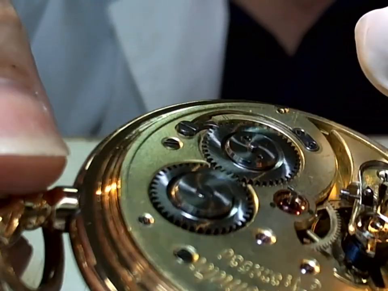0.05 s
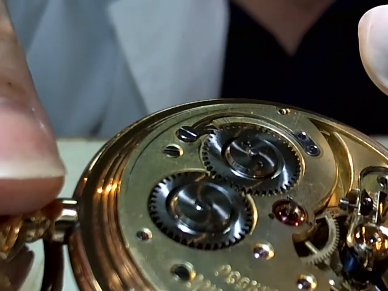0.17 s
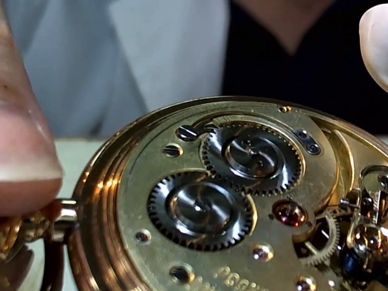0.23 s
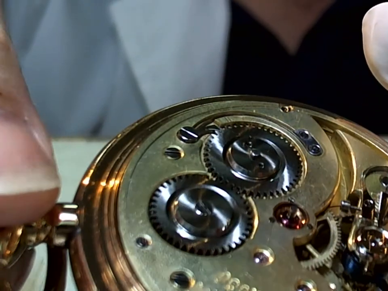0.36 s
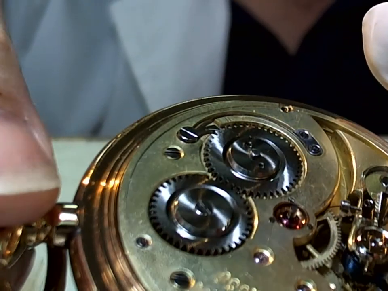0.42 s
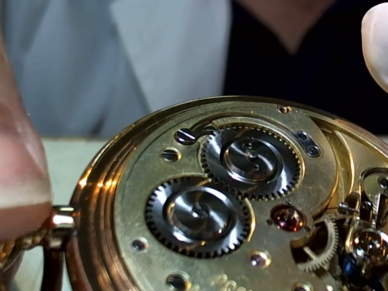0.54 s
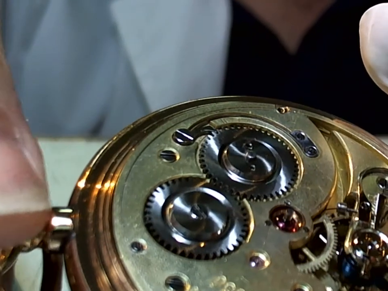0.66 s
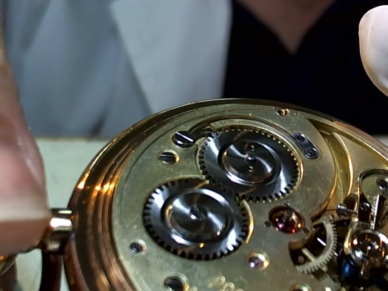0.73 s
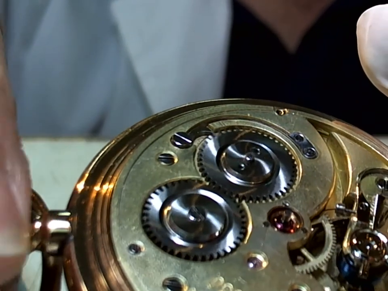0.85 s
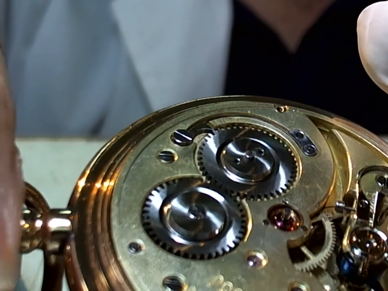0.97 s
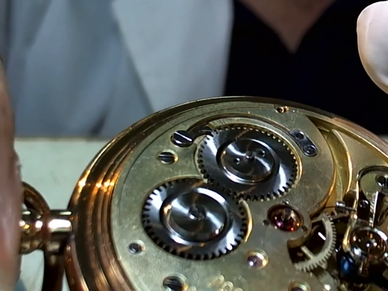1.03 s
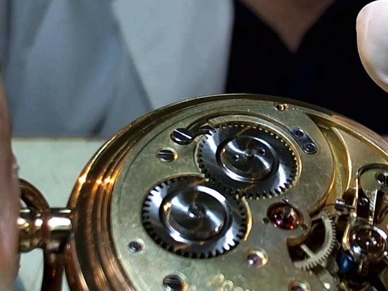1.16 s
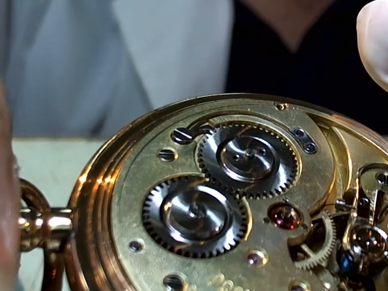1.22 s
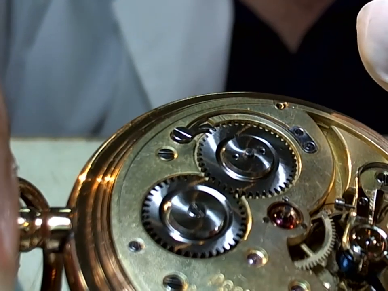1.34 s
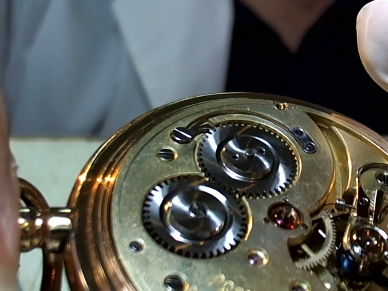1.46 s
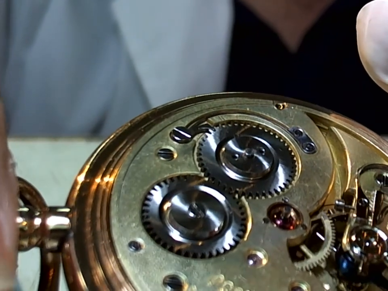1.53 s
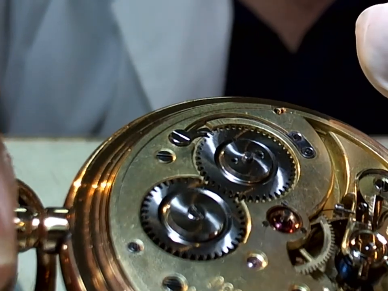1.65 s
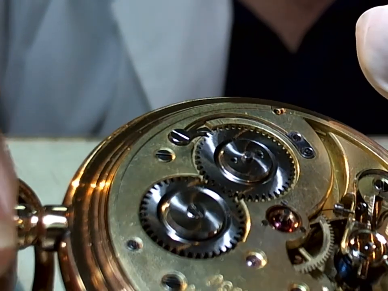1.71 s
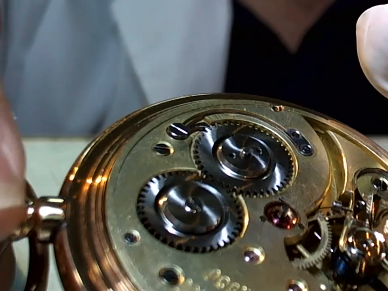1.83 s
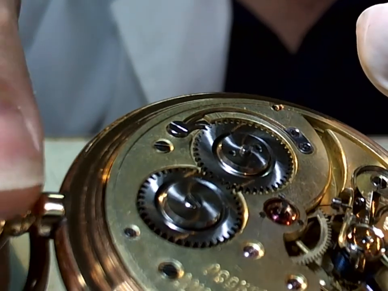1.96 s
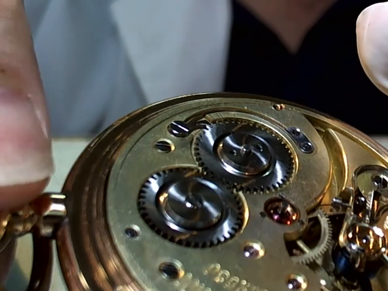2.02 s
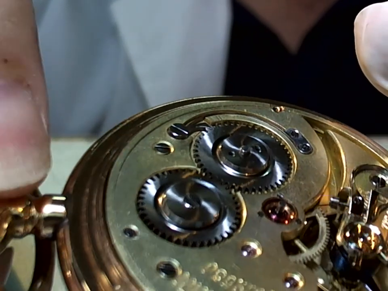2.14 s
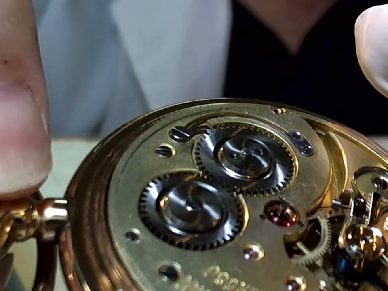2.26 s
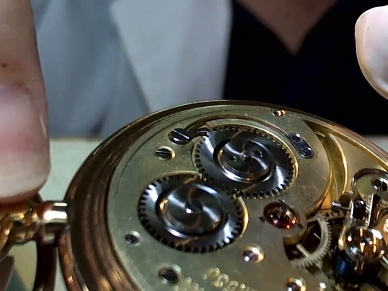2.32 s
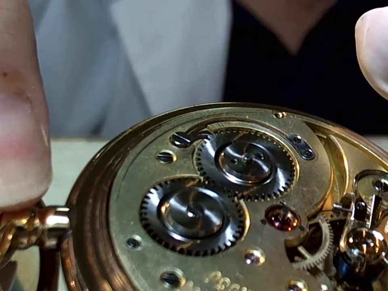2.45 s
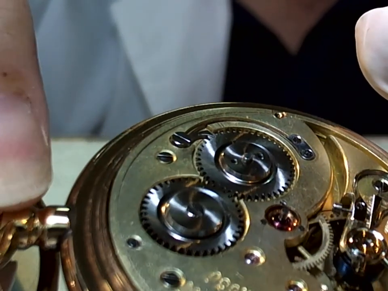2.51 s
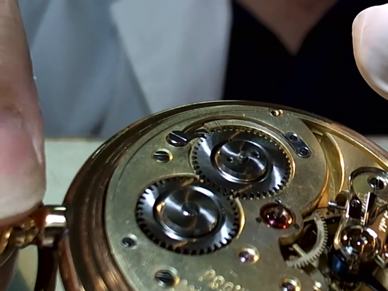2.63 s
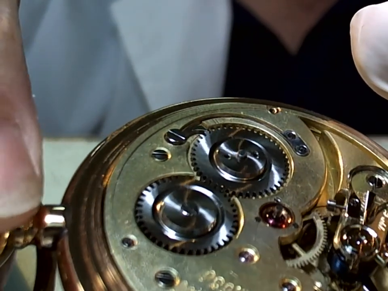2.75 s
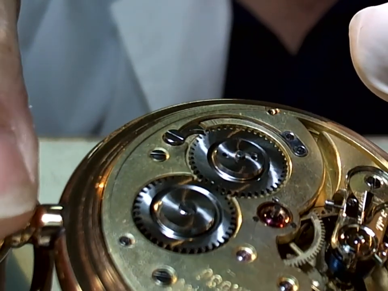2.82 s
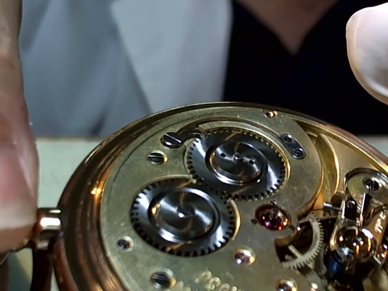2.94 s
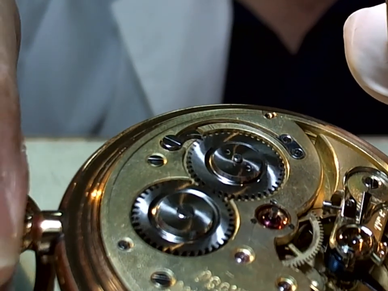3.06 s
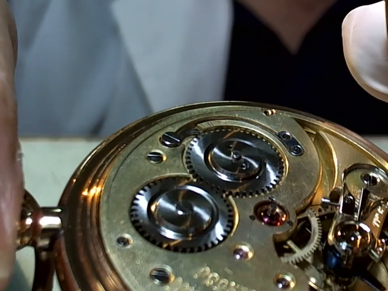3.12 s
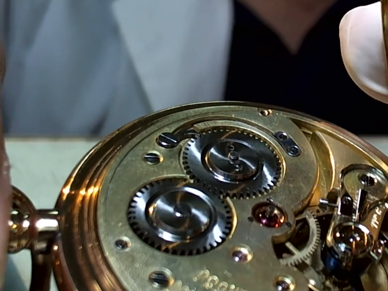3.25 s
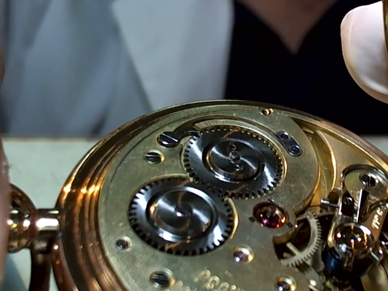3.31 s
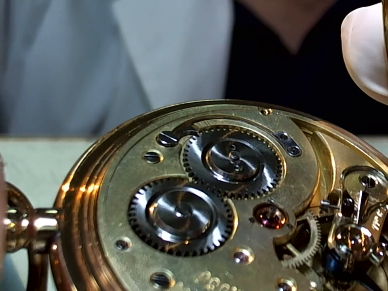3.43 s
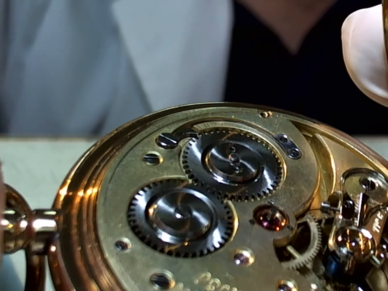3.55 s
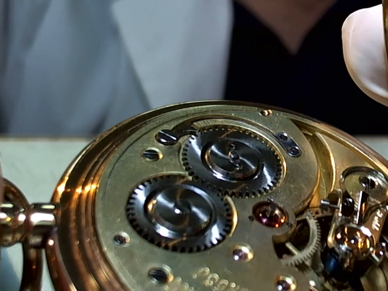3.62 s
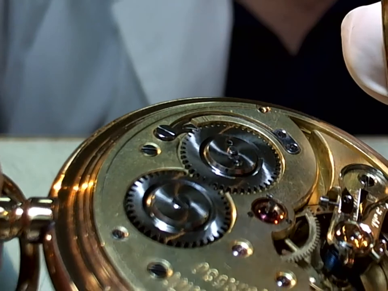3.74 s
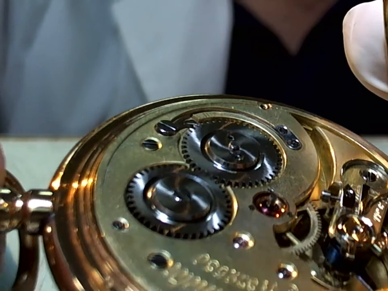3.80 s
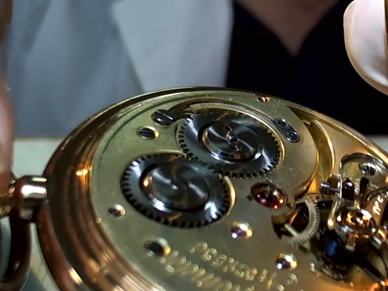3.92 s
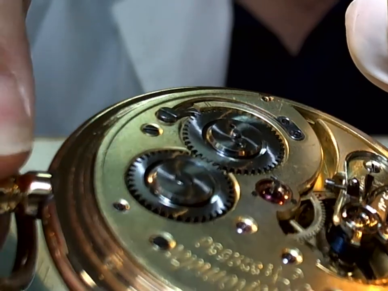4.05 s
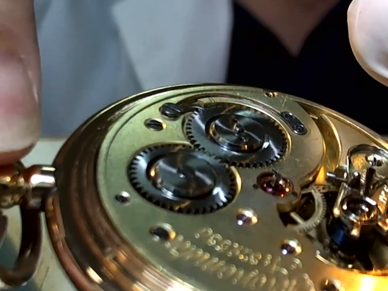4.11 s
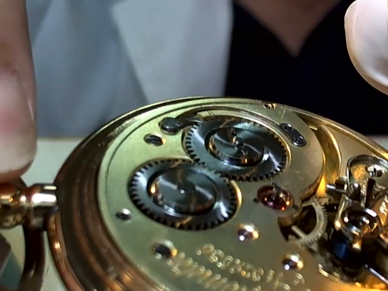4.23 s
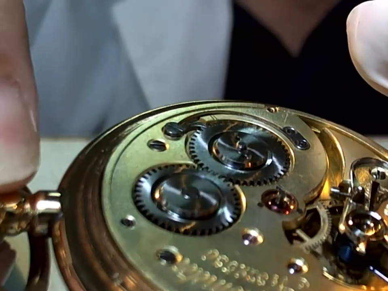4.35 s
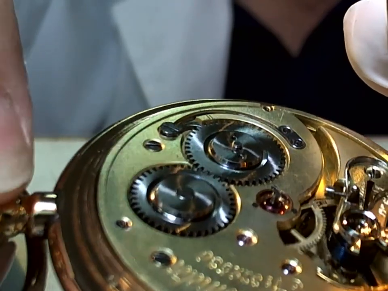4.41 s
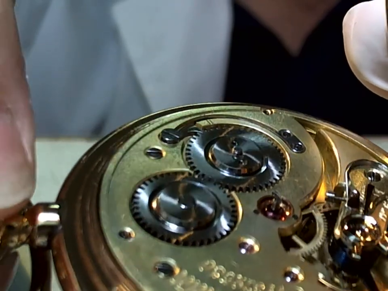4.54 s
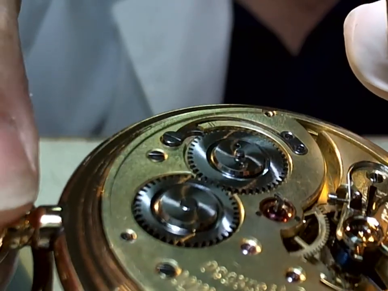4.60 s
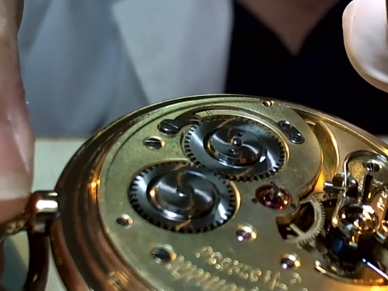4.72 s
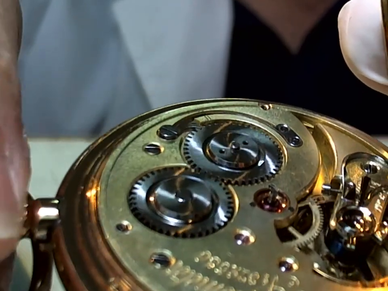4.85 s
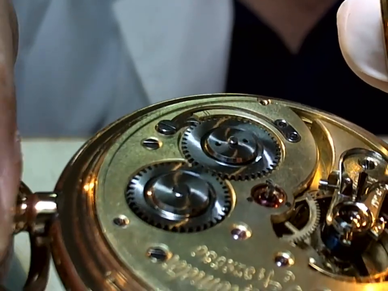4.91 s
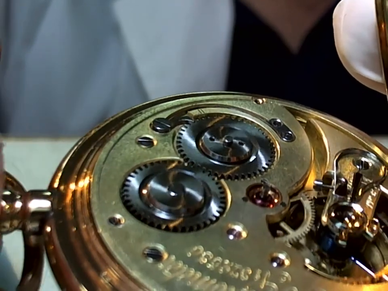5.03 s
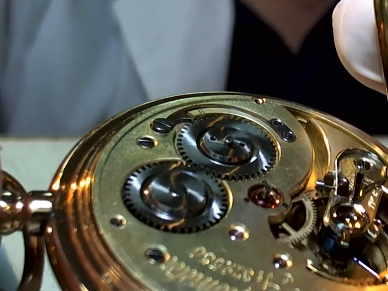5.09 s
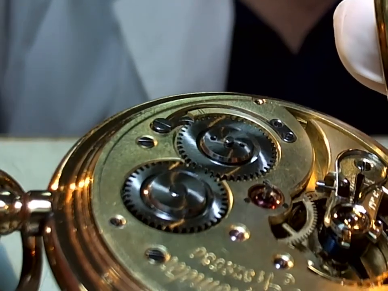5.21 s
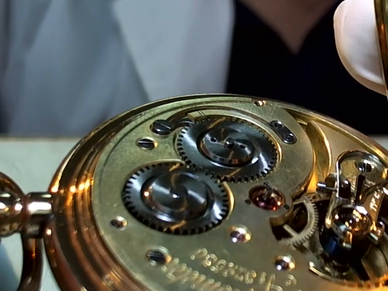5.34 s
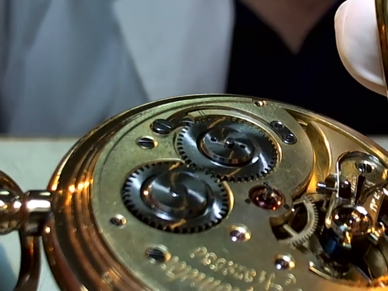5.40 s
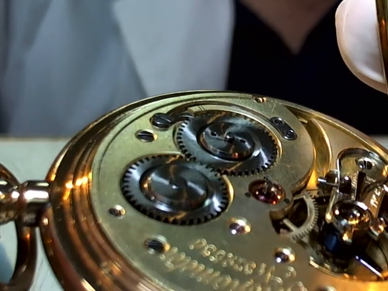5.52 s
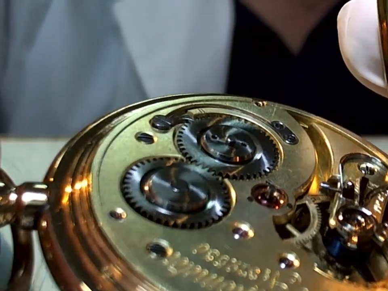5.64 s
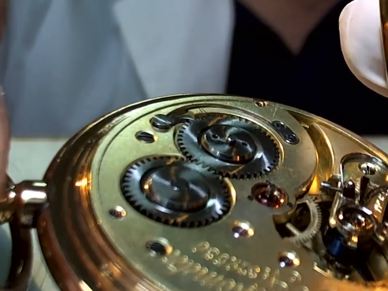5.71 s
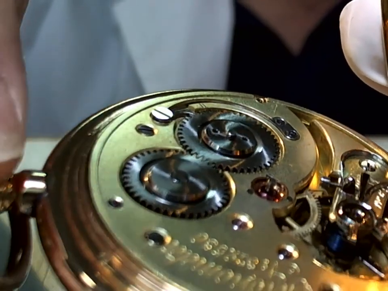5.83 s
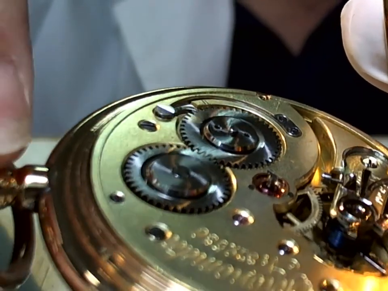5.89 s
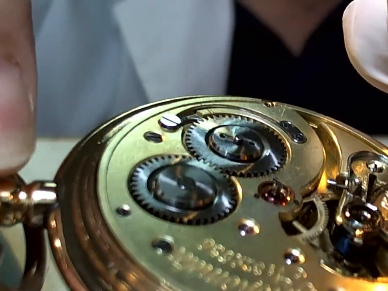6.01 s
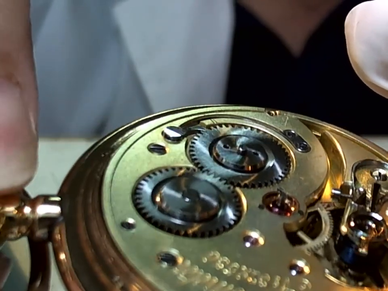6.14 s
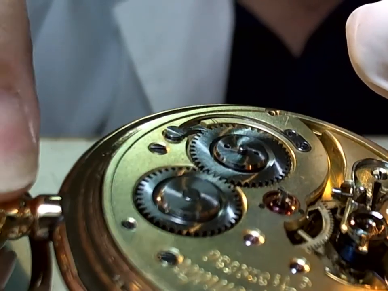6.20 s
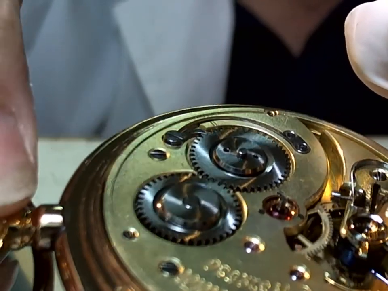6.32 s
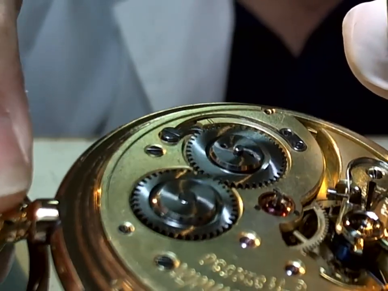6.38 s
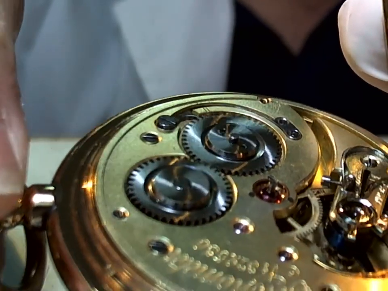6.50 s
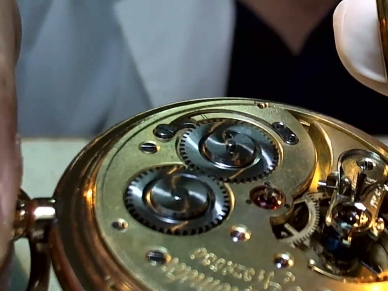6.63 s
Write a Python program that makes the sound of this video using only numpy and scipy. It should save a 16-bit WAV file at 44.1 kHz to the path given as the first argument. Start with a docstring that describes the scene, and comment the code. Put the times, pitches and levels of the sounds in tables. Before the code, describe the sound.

A small quiet room with low hum and soft air. A wooden-cased clock ticks about every 0.55 seconds behind, and a fainter, softer tsk comes once a second. Close up, fingers bump a pocket watch with muffled low thuds. From 0.6 to 1.2 seconds the crown turns back with about ten light, thin clicks. From 1.85 to 2.2 a louder forward run of crisp steel ratchet snaps follows, with a sharp extra slip at 2.1. Lighter backward clicking returns from 2.8 to 3.3, then a fast forward burst at 3.9 to 4.15. Faint, fuzzy squeaks slip in between 3.6 and 4.9. Another soft backward run spans 4.6 to 5.2, bright forward snaps run from 5.7 to 6.05, and a last light run starts at 6.4. Clicks ring briefly in metal; tiny scratchy contacts fall between.

```python
"""A pocket watch with its back open is wound close to the microphone, in a small quiet room.
From the start a low hum and soft air lie behind, a clock ticks further off, and a fainter one steps once a second.
Low thuds and short contact noises fall throughout; first the crown turns back, and clutch teeth slip, light and thin.
Three forward turns then alternate with three more turns back; each forward turn snaps the click over the ratchet.
Snaps are filtered impulses with noise that excite decaying modes; faint gliding squeaks join in the second half."""
import sys
import numpy as np
from scipy import signal
from scipy.fft import rfft, irfft
from scipy.io import wavfile
from scipy.ndimage import uniform_filter1d

SR = 44100
rng = np.random.default_rng(int(sys.argv[2]) if len(sys.argv) > 2 else 0)


def materialize(psi):
    """Save the field psi as 16-bit PCM at rate SR to the path in sys.argv[1].

    A 1-D psi becomes a single channel; in a 2-D psi each row is a channel.
    """
    bounded = np.clip(np.atleast_2d(psi).T, -1, 1)
    quanta = np.round(bounded * 32767).astype(np.int16)
    wavfile.write(sys.argv[1], SR, quanta)


N = 293706  # samples


def amp(db):
    """Gain as the antilogarithm of a level in decibels."""
    return 10 ** (np.asarray(db) / 20)


def unit(x):
    """Normalization by signal power, to an rms of one."""
    return x / np.sqrt(np.mean(x ** 2) + 1e-20)


def read(points, hz):
    """Linear interpolation of a spectrum along a log-frequency axis."""
    f, value = np.transpose(points)
    return np.interp(np.log(hz + 1), np.log(f), value)


def hill(hz, centre_hz, octaves):
    """Gaussian weighting on the octave scale."""
    distance = np.log2((hz + 1) / centre_hz) / octaves
    return np.exp(-.5 * distance ** 2)


def add(mix, s, sound):
    """Superposition: adds a sound to the mix at time s, clipped to its ends."""
    at = round(s * SR)
    sound = sound[..., max(-at, 0):]
    part = mix[..., max(at, 0):][..., :sound.shape[-1]]
    part += sound[..., :part.shape[-1]]


def seconds(size):
    """Time axis by uniform sampling."""
    return np.arange(size) / SR


def band_noise(centre_hz, octaves, size):
    """White noise shaped by a Gaussian band in the spectrum, at an rms of one."""
    spectrum = rfft(rng.standard_normal(size))
    band = hill(np.fft.rfftfreq(size, 1 / SR), centre_hz, octaves)
    return unit(irfft(spectrum * band, size))


def causal(db):
    """Minimum-phase response: the Hilbert transform of log gain gives a sharp front, then the ring."""
    log_gain = np.log(amp(np.concatenate([db, db[-2:0:-1]])))
    return np.exp(np.conj(signal.hilbert(log_gain)))[:len(db)]


def background(side_db=-9, air_db=-58.5, waver=0.31, low_cut_hz=50):
    """Diffuse air noise, wider in the bass than in the treble, under hum sines of wavering phase."""
    # spectrum of the air: (frequency [Hz], relative level per Hz [dB])
    air_spectrum = [(15, -48.5), (25, -22), (70, -38.5), (117, 3), (394, -6), (463, -11), (516, -9.5),
                    (775, -13), (1190, -13.5), (1520, -19.5), (2610, -20.5), (3820, -30), (5570, -28),
                    (12500, -43), (16000, -64.5)]
    # hum lines: (frequency [Hz], rms level before the left-right balance [dB])
    hum_lines = [(60, -77.5), (119.6, -69.5), (240, -70), (409, -70.5), (521, -69.5)]
    hz, t = np.fft.rfftfreq(N, 1 / SR), seconds(N)
    shape = amp(read(air_spectrum, hz)) * hz ** 4 / (hz ** 4 + low_cut_hz ** 4)
    width = amp(read([(700, 10), (1500, -30.5)], hz))
    spectra = rfft(rng.standard_normal((2, N)))
    mid, side = irfft(spectra * np.array([shape, shape * width]), N)
    air = amp(air_db) * (unit(mid) + amp(side_db) * np.outer([1, -1], unit(side)))
    knots = np.linspace(0, t[-1], num=60)
    hum = np.zeros(N)
    for f, db in hum_lines:
        drift = waver * np.interp(t, knots, rng.standard_normal(len(knots)))  # radians
        hum += amp(db) * np.sqrt(2) * np.sin(2 * np.pi * f * t + drift)
    return (air + hum) * amp([[-.9], [.9]])  # slightly stronger on the right


def room(x, tail_db=-14, spread=0.21, count=3):
    """Reverberant decay as convolution with fading noise; three noise tails crossfade in turn."""
    # colour of the tail: (frequency [Hz], relative gain [dB])
    tail_colour = [(300, -1), (1500, 4.5), (2500, 1.5), (5500, 1), (7400, 2), (8200, -9.5), (9000, 2.5),
                   (9900, -4), (13000, -5)]
    # reverberation time: (frequency [Hz], t60 [s])
    tail_t60 = [(500, 0.28), (2500, 0.072), (6000, 0.11), (13000, 0.12)]
    out, t = np.zeros((2, N)), seconds(N)
    for k in range(count):
        noise = rng.standard_normal((3, SR // 3))
        hz, age, z = signal.stft(noise[0] + spread * noise[1:], SR, nperseg=256)
        fall_db = 60 * age / read(tail_t60, hz)[:, None]
        z *= amp(read(tail_colour, hz)[:, None] - fall_db)
        tail = signal.istft(z, SR, nperseg=256)[1]
        tail *= seconds(tail.shape[1]) > .005  # silent for the first 5 ms
        tail /= np.linalg.norm(tail[0])
        # the squared shares of the tails keep a constant sum
        share = np.sqrt(2 / count) * np.cos(np.pi * (7 * t + k / count))
        out += signal.oaconvolve((share * x.mean(0))[None], tail, axes=1)[:, :N]
    return amp(tail_db) * out


def far_clock(level_db=-60, hz=5300, rise_s=0.015):
    """A distant clock as a periodic source: each one-second step is a soft tsk of narrow noise."""
    out, t = np.zeros(N), seconds(size=4096)
    swell = (t / rise_s) ** 2 * np.exp(2 - 2 * t / rise_s)
    for s in np.arange(.329, N / SR, 1):
        add(out, s, amp(level_db) * band_noise(hz, 0.19, len(t)) * swell)
    return out


def clock(case_rise_s=0.012, case_delay_s=0.0091, run_s=0.075, rest=0.096, side=0.44, alike=0.54):
    """Modal resonance: the escapement strikes, the works rattle and the wooden case swells up behind."""
    # modes of the wooden case: (frequency [Hz], gain before the onset [dB], t60 [s])
    wood_modes = [(415.5, -30, 0.068), (527.6, -37.5, 0.064), (620, -67, 0.25), (722, -37.5, .06),
                  (845, -32.5, 0.1), (968, -55.5, 0.096), (1075, -41.5, .11), (1170, -37, 0.06),
                  (2520, -33.5, 0.04)]
    # rattle of the works: (centre [Hz], width [octaves], gain before the envelope [dB],
    #                       delay [s], rise [s], decay [s])
    works_bands = [(4670, 0.2, -32.5, 0, 0.00059, 0.0048), (5190, 0.16, -40, 0.004, 0.00352, 0.019),
                   (2410, 0.28, -47.5, .003, 0.0014, 0.023), (558, 0.82, -39.5, 0.00031, 0.01, 0.029),
                   (1900, 0.73, -49, 0.013, 0.0016, 0.0067), (9310, 0.16, -64.5, 0.0032, 0.001, 0.048)]
    out, t = np.zeros((2, N)), seconds(size=8192)
    late = np.maximum(t - case_delay_s, 0)
    ears = side * np.array([[1], [-1]])  # the case reaches the two sides a little out of step
    body = np.zeros((2, len(t)))
    for hz, db, t60 in wood_modes:
        phase = 2 * np.pi * (hz * t + rng.random()) + ears * 400 / hz
        body += amp(db - 60 * late / t60) * np.sin(phase)
    body *= 1 - np.exp(-(late / case_rise_s) ** 2)
    settle = rest + (1 - rest) / (1 + np.exp((t - run_s) / .004))  # the wheels come to a stop
    beats = np.arange(-.0112, N / SR, .5497)  # seconds
    for s in beats:
        add(out, s, body)
    for hz, octaves, db, delay, rise, decay in works_bands:
        age = np.maximum(t - delay, 0)
        envelope = amp(db) * settle * (1 - np.exp(-age / rise)) * np.exp(-age / decay)
        usual = band_noise(hz, octaves, len(t))  # the same parts meet in much the same way on every beat
        for s in beats:
            rattle = envelope * (alike * usual + (1 - alike) * band_noise(hz, octaves, len(t)))
            add(out, s, rattle * np.linalg.norm(envelope) / np.linalg.norm(rattle))
    return out


def squeaks(width_hz=330):
    """Quadrature modulation: low-passed noise carried up to a gliding frequency as a fuzzy squeak."""
    # faint squeaks: (time [s], length [s], rms level before the fades [dB], start [Hz], end [Hz])
    squeak_list = [(3.616, .13, -53.5, 2330, 2430), (3.977, 0.1, -47.5, 2100, 2130),
                   (4.156, .12, -56, 2930, 2520), (4.584, 0.11, -56.5, 2070, 2000),
                   (4.709, .02, -42, 2050, 1900), (4.8, .1, -46, 2185, 2296)]
    out = np.zeros(N)
    low_pass = signal.butter(2, width_hz / 2, fs=SR, output="sos")
    for s, length, db, start_hz, end_hz in squeak_list:
        size = int(length * SR)
        fuzz = signal.sosfilt(low_pass, rng.standard_normal((2, N)))[:, -size:]
        turn = 2 * np.pi * np.cumsum(np.linspace(start_hz, end_hz, size)) / SR
        squeak = unit(fuzz[0] * np.cos(turn) + fuzz[1] * np.sin(turn))
        add(out, s, amp(db) * squeak * signal.windows.tukey(size, .5))
    return out


def fidgets(count, level_db, centre_hz, octaves, uneven_db=2):
    """Jittered point process: light shifts of the grip over the whole time, as (time [s], level [dB], Hz)."""
    when, strength, pitch = rng.uniform(-1, 1, (count, 3)).T
    s = (np.arange(count) + .5 + .5 * when) * N / SR / count
    return list(zip(s, level_db + uneven_db * strength, centre_hz * 2 ** (octaves * pitch)))


def low_thuds(rise_s=.012):
    """Heavily damped oscillation: bumps of the hands and two low clock knocks give a few cycles each."""
    # low thuds: bumps of the hands, and the extra low knock of two stronger clock beats (391 Hz):
    # (time [s], peak level of the sine part [dB], frequency [Hz])
    thud_list = [(.001, -39.5, 391), (0.049, -45.5, 232), (0.597, -45, 200), (.858, -46, 270),
                 (1.046, -48, 161), (1.229, -49.5, 190), (1.443, -52, 170), (1.549, -47, 191),
                 (2.236, -44.5, 223.5), (2.374, -46.5, 194), (3.84, -38.5, 391), (3.931, -47, 250.4),
                 (4.948, -44, 282), (5.237, -47, 244)]
    out, t = np.zeros(N), seconds(size=6000)
    swell = (t / rise_s) ** 2 * np.exp(2 - 2 * t / rise_s)
    for s, db, hz in thud_list + fidgets(count=8, level_db=-52.5, centre_hz=209, octaves=0.38):
        thud = np.sin(2 * np.pi * hz * t) + .5 * band_noise(hz, 0.76, len(t))
        add(out, s, amp(db) * swell * thud)
    return out


def contacts(linger=0.14, linger_s=0.0066, octaves=0.54):
    """Contact noise: brief scratchy bursts, each a band of noise with two decays."""
    # short contact noises: taps of nail and crown, and one loud slip of the ratchet click at 2.101 s:
    # (time [s], peak short-term rms level [dB], centre [Hz], decay [s])
    contact_list = [(.103, -55, 975, 0.01), (.113, -58.5, 8200, 0.0098), (.463, -50, 1600, 0.0032),
                    (1.195, -43, 7500, 0.0038), (1.253, -44.5, 3940, 0.0059), (1.461, -53, 4900, 0.0055),
                    (1.762, -44.5, 4150, 0.00067), (2.101, -24.5, 4500, 0.0044),
                    (2.4158, -50.5, 3700, 0.0073), (2.6148, -37, 6800, 0.0033), (2.68, -49, 795, 0.0086),
                    (2.692, -47, 4300, .007), (3.232, -37.5, 3530, 0.0083), (3.83, -40.5, 4900, 0.0017),
                    (5.6304, -46, 4150, 0.00054), (6.2055, -37, 8500, 0.0029)]
    out, t = np.zeros((2, N)), seconds(size=4096)
    for s, db, hz, decay in contact_list:
        fall = np.exp(-t / decay) + linger * np.exp(-t / linger_s)
        burst = band_noise(hz, octaves, len(t)) * fall * (1 - np.exp(-4 * t / decay))
        peak_rms = np.sqrt(uniform_filter1d(burst ** 2, size=220).max())  # over 5 ms
        add(out, s, amp(db) * burst / peak_rms)
    return out


def crossings(angle):
    """Monotone cubic interpolation of (time [s], teeth): the times at which each whole tooth passes."""
    s, tooth = np.transpose(angle)
    span = np.diff(tooth)
    gap = np.diff(s) / span  # seconds a tooth
    weight = (1 + span[1:] / (span[1:] + span[:-1])) / 3
    slope = np.gradient(s, tooth, edge_order=2)
    slope[1:-1] = 1 / (weight / gap[:-1] + (1 - weight) / gap[1:])  # weighted harmonic mean
    times = []
    for k, steps in enumerate(span):
        u = np.arange(steps) / steps
        ease = u * (1 - u) * ((slope[k] - gap[k]) * (1 - u) - (slope[k + 1] - gap[k]) * u)
        times += list(s[k] + steps * (gap[k] * u + ease))
    return np.array(times + [s[-1]])


def turns(angles, grips, faster_db, faster_body_db, faster_bright_db, swell_db, dulling_db,
          uneven_db, uneven_tone_db, end_lean=.3, usual_teeth_per_s=25):
    """Kinematics of the crown: a tooth drops at each whole step of its angle, and speed sets level and tone.
    Gives rows of (time [s], level [dB], body [dB], brightness [dB], left-right [dB])."""
    rows = []
    for angle, (db, body_db, gained_db, bright_db, pan_db) in zip(angles, grips):
        s = crossings(angle)
        faster = np.log2(1 / np.gradient(s) / usual_teeth_per_s)  # doublings of speed
        along = np.linspace(-.5, .5, len(s))
        press = np.cos(np.pi * along)  # the fingers press and tilt the watch most at mid-turn
        chance = rng.standard_normal((len(s), 3)).T
        level = db + faster_db * faster + swell_db * (press - press.mean()) + uneven_db * chance[0]
        body = body_db + faster_body_db * faster + gained_db * along + uneven_tone_db * chance[1]
        bright = bright_db + faster_bright_db * faster - dulling_db * along + uneven_tone_db * chance[2]
        rows += zip(s, level, body, bright, pan_db * (end_lean + (1 - end_lean) * press))
    return rows


def teeth(rows, colour, chatter, chatter_s, scrape, echo, echo_s, apart=0.1, alike=0.5, size=2048):
    """Impact excitation: each tooth scrapes to its edge, snaps, chatters, and echoes off hands and bench."""
    out, hz, lead = np.zeros((2, N)), np.fft.rfftfreq(size, 1 / SR), size // 8
    t = seconds(size) - lead / SR  # zero at the snap
    after = chatter * np.exp(-abs(t) / chatter_s) + echo * np.exp(-abs(t) / echo_s)
    before = scrape * (np.exp(-abs(t) / 0.00035) + 0.13 * np.exp(-abs(t) / 0.0056))
    window = .004 * SR  # the level is the rms of the snap's energy over 4 ms
    usual = rng.standard_normal(size)  # every tooth bounces in much the same way
    likeness = np.clip(alike, 0, 1) * np.exp(-abs(t) / 0.0025)
    body_share = read([(2800, 1.0), (4000, 0.11)], hz)
    bright_share = read([(6000, 0.24), (8000, 0.76)], hz)
    for s, db, body_db, bright_db, pan_db in rows:
        own, differing = rng.standard_normal((2, size))
        common = likeness * usual + np.sqrt(1 - likeness ** 2) * own
        sides = apart * np.outer([1, -1], differing) * np.exp(-abs(t) / .002)
        force = np.where(t > 0, after, before) * (common + sides)
        force[:, lead] += 1  # the snap itself
        tone_db = body_db * body_share + bright_db * bright_share
        snap = rfft(force) * causal(read(colour, hz) + tone_db)
        snap *= amp(db) * np.sqrt(window / np.sum(irfft(snap.mean(0)) ** 2))
        lean_db = pan_db * hill(hz, 4800, 0.28)  # the mid treble beams to one side
        add(out, s - lead / SR, irfft(snap * amp(np.outer([.5, -.5], lean_db))))
    return out


def case_ring(x, ring_db):
    """Modal superposition: the plates and the case ring on after every blow as decaying cosines."""
    # modes of plates and case: (frequency [Hz], gain at resonance before ring_db [dB], t60 [s])
    plate_modes = [(1768, 4.5, 0.037), (2223, 5.5, 0.09), (2330, 5.5, 0.063), (2410, 10.5, 0.047),
                   (2585, 17.5, 0.065), (3211, 15, 0.083), (3602, 2.5, .05), (3904, -10, 0.045),
                   (4400, -9.5, 0.052), (4900, -13.5, 0.14), (5080, -2, 0.051), (5180, 0.5, 0.031),
                   (5270, -8.5, 0.065), (5570, -0.5, 0.07), (5970, -7, .09), (6147, -8.5, 0.053),
                   (6960, 4, 0.045), (8260, -1, 0.12), (8140, -10, 0.037), (9730, -4.5, 0.0052),
                   (10700, 0.5, 0.01), (10900, -4.5, .05)]
    t = seconds(size=8192)
    ring = np.zeros(len(t))
    for hz, db, t60 in plate_modes:
        resonance_scale = 2 * np.log(1000) / (t60 * SR)
        ring += amp(db - 60 * t / t60) * resonance_scale * np.cos(2 * np.pi * hz * t)
    return amp(ring_db) * signal.oaconvolve(x.mean(0), ring)[:N]


def scene():
    """Linear superposition of the watch in front with the clocks and the room behind."""
    # colour of the two steel impacts: (frequency [Hz], relative gain [dB])
    ratchet_colour = [(200, -48), (800, -37), (1080, -28), (1800, -14), (2400, -11), (2950, -17), (4200, 1),
                      (5300, -2), (6400, -7), (7400, -11.5), (8400, -4.5), (10700, -10.5), (13500, -19.5),
                      (16000, -49)]
    clutch_colour = [(200, -36.5), (1400, -29.5), (2150, -5.5), (2950, -19), (3900, -3), (5100, -0.5),
                     (7500, -7), (8200, 2), (9000, -4.5), (9900, -0.5), (11400, -14), (12300, -9),
                     (14500, -24.5), (16000, -29)]
    # angle of the crown through each forward turn: (time [s], ratchet teeth passed [count])
    forward_angle = [
        [(1.8537, 0), (1.9464, 2), (2.1249, 6), (2.1707, 7)],
        [(3.8843, 0), (3.9571, 2), (4.035, 4), (4.1505, 7)],
        [(5.6832, 0), (5.7176, 1), (5.7558, 2), (5.7921, 3), (5.8807, 5), (5.9642, 7), (6.0383, 8)],
    ]
    # angle of the crown through each turn back: (time [s], clutch teeth passed [count])
    back_angle = [
        [(.6174, 0), (.6777, 1), (.7448, 2), (.9408, 7), (.9865, 8), (1.0425, 9), (1.2027, 10)],
        [(2.7997, 0), (2.8662, 1), (2.909, 2), (2.9904, 4), (3.0764, 7), (3.2016, 11), (3.2637, 12)],
        [(4.6409, 0), (4.6975, 1), (4.8405, 5), (4.8637, 6), (4.9273, 8), (5.0236, 11), (5.0846, 12),
         (5.2033, 13)],
        [(6.422, 0), (6.467, 1), (6.566, 4), (6.5988, 5), (6.6508, 7)],
    ]
    # each turn's sound, forward as set by the grip, before speed, press and chance: (level [dB], body [dB],
    # body gained along the turn [dB], brightness [dB], left-right at mid-turn [dB])
    forward_grip = [(-20, 5, -2, 2, -8.5), (-19.5, 1, 5, -3, -9), (-18.5, 1.3, 2, 2.5, -12)]
    back_grip = [(-26.5, -3, 8.5, -5.5, -0.5), (-29, 1, 3, -1.5, -3.5), (-27.5, 1, -1, 2, -1.5),
                 (-27.5, -1, 1, 1.5, -5)]
    ratchet = turns(forward_angle, forward_grip, faster_db=-1.3, faster_body_db=2.5, faster_bright_db=1,
                    swell_db=2, dulling_db=7.5, uneven_db=0.17, uneven_tone_db=0.7)
    clutch = turns(back_angle, back_grip, faster_db=1.64, faster_body_db=2.5, faster_bright_db=1,
                   swell_db=-0.7, dulling_db=1.0, uneven_db=0.33, uneven_tone_db=0.25)
    forward = teeth(ratchet, ratchet_colour, chatter=.17, chatter_s=0.0017,
                    scrape=0.11, echo=0.13, echo_s=0.0029)
    back = teeth(clutch, clutch_colour, chatter=0.27, chatter_s=0.0018,
                 scrape=0.19, echo=0.016, echo_s=0.012)
    # ratchet and clutch ring the same plates, each through its own path
    watch = forward + back + case_ring(forward, ring_db=-1.8) + case_ring(back, ring_db=0)
    touches = contacts()
    near = watch + touches + room(watch + .5 * touches) + low_thuds() + squeaks()
    return near + clock() + far_clock() + background()


def record(dry):
    """Saturation and band limiting: the recorder rounds off the highest peaks and cuts the top treble."""
    rounded = np.tanh(dry)
    low_pass = signal.firwin(255, 16300, window=("kaiser", 9), fs=SR)  # edge in Hz
    return signal.oaconvolve(rounded, low_pass[None], "same", axes=1)


dry = scene()
out = record(dry)
materialize(out)
```